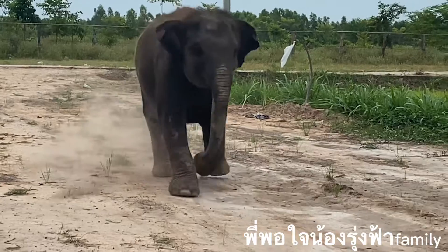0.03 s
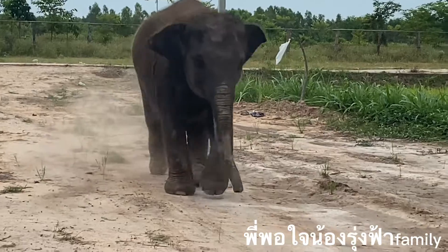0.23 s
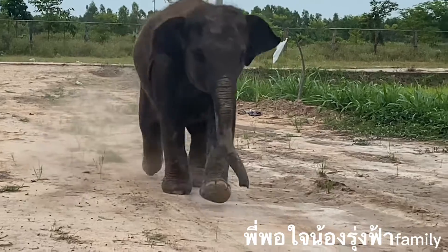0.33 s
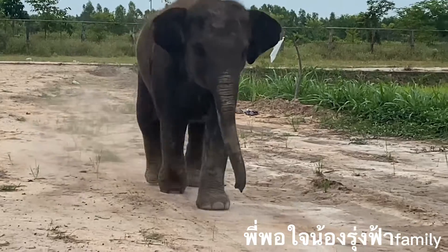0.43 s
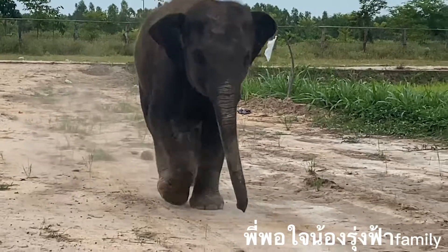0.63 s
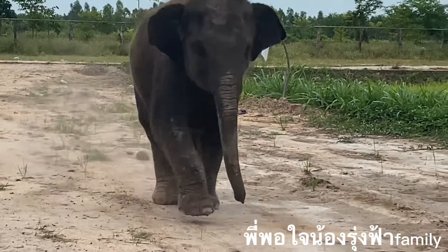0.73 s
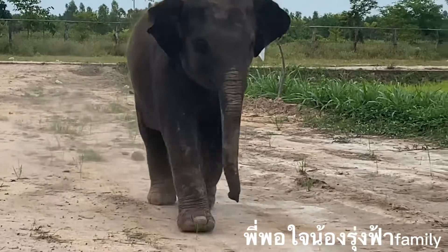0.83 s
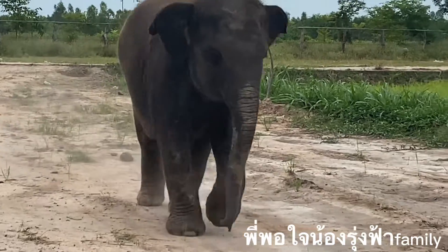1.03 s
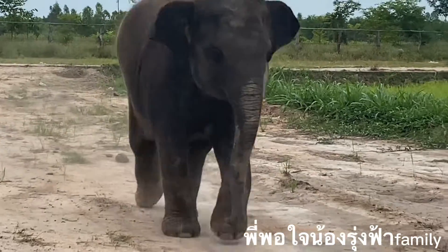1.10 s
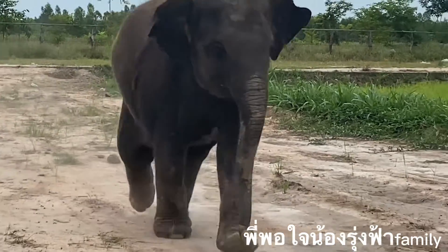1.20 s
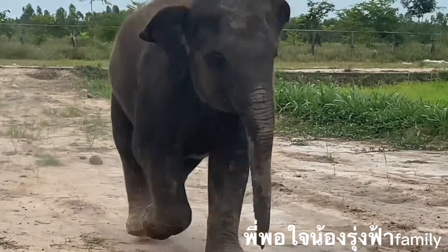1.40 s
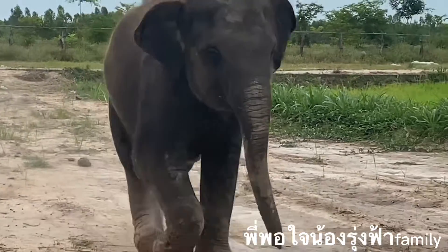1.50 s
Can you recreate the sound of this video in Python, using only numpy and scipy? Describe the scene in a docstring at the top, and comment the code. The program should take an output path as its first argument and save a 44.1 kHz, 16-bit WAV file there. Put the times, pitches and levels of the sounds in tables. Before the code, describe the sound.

A young elephant squeals once, high and raspy, as its heavy feet thud on sandy ground.

```python
"""Dry, dusty open ground with a far tree line, heard in stereo. A young elephant walks up to the
microphone, its feet knocking on the crust and scuffing the sand, and squeals once through its trunk:
a rasping start, a thin high arch, then a loud pure note that rings off the trees.
A small bird trills in the distance, another slurs, and a low outdoor rumble lies under everything."""
import sys
import numpy as np
from scipy import signal
from scipy.fft import rfft, irfft, next_fast_len
from scipy.io import wavfile
from scipy.ndimage import map_coordinates

SR = 44100
rng = np.random.default_rng(int(sys.argv[2]) if len(sys.argv) > 2 else 0)


def store_pcm(level_fs):
    """Save levels as 16-bit WAV."""
    pcm = np.round(np.clip(level_fs, -1, 1) * 32767).astype(np.int16)
    wavfile.write(sys.argv[1], SR, np.atleast_2d(pcm).T)


N = 68355

# faint open air all round: frequency_hz, density_db
AIR_COLOUR = [(90, -8), (150, 5), (530, -12), (1400, -36), (2300, -25.5), (4600, -28.5), (7500, -22.5),
              (9000, -48), (11000, -31), (15500, -51)]
# low outdoor rumble: frequency_hz, density_db
RUMBLE_COLOUR = [(20, -40.5), (35, -20), (52, 5.5), (75, 0), (105, -1), (135, -9.5), (190, -21.5),
                 (320, -29), (600, -43.5), (1500, -84)]
# its swell: time_s, level_db
RUMBLE_LEVEL = [(0, -50), (.5, -47.5), (.95, -49), (1.1, -43.5), (1.25, -48), (1.55, -48)]
# a low hum, to the right: time_s, level_db
HUM_LEVEL = [(0, -65), (.93, -58), (1.01, -37), (1.07, -42), (1.12, -55), (1.24, -49.5), (1.3, -44),
             (1.45, -47), (1.55, -45)]
# soles dragging in the sand: time_s, level_db
SCUFF_LEVEL = [(0, -61), (.11, -65.5), (.15, -70.5), (.27, -64.5), (.6, -58), (.76, -58), (.85, -75),
               (.89, -57.5), (.97, -53.5), (1.06, -64.5), (1.1, -68.5), (1.19, -68), (1.27, -59),
               (1.36, -48.5), (1.435, -50), (1.455, -68), (1.55, -73)]
# sliding sand: frequency_hz, density_db
SAND_COLOUR = [(120, 0), (200, -11.5), (340, 0), (560, -6), (800, 1), (1400, -4.5), (2000, -11.5),
               (3400, -15), (6800, -23), (9000, -27), (15000, -38)]
# grit snapping underfoot: start_s, level_db
GRIT_SNAPS = [(0.03, -43), (.095, -50), (0.71, -48.5), (0.878, -51), (1.15, -51.5), (1.29, -40),
              (1.352, -41.5), (1.367, -42), (1.537, -58)]
# filter on the snaps: frequency_hz, gain_db
GRIT_COLOUR = [(300, -32.5), (1500, 0.5), (3500, 1.5), (5500, -8), (8000, -12.5), (15000, -20)]
# feet knocking on the crust: start_s, pitch_drop_s, level_db
KNOCKS = [(.093, 0.0018, -49.5), (.894, 0.0022, -41), (0.912, 0.0016, -56), (.934, 0.0014, -43.5),
          (.992, 0.0018, -37), (1.042, 0.0023, -36), (1.133, 0.0021, -42.5), (1.18, 0.0024, -48),
          (1.205, 0.0026, -44), (1.246, 0.0022, -43), (1.287, .004, -41), (1.537, 0.0025, -40)]
# filter on the crumbling crust: frequency_hz, gain_db
CRUMBLE_COLOUR = [(100, -22.5), (300, 4), (500, -1.5), (1000, 10), (1400, -10), (1900, -5), (2500, -22),
                  (5000, -34), (15000, -64)]
# soft, heavy footfalls: start_s, pitch_hz, t60_s, level_db
THUDS = [(0.119, 68, .11, -31), (0.192, 61.5, 0.1, -24), (0.277, 332, 0.035, -38),
         (0.311, 76.2, 0.35, -32.5), (0.429, 292, 0.064, -46), (0.642, 60, 0.15, -30),
         (0.758, 76, 0.079, -23), (0.877, 288, .05, -43), (1.041, 58.2, 0.11, -32),
         (1.354, 292, 0.024, -22)]
# one bird's slurs, mostly rising: start_s, length_s, from_hz, to_hz, level_db
SLURS = [(0.136, 0.033, 5500, 4300, -68.5), (0.796, 0.042, 2690, 5160, -69), (.828, 0.041, 4660, 4350, -69),
         (0.861, 0.055, 5100, 6200, -68.5), (1.013, 0.021, 3920, 4400, -67),
         (1.223, 0.033, 3790, 5250, -64)]
# the distant bird's trill: start_s, level_db
TRILL_NOTES = [(.993, -72), (1.041, -68), (1.072, -72), (1.103, -68.5), (1.134, -66), (1.171, -61),
               (1.205, -58), (1.241, -56), (1.277, -54.5), (1.313, -52), (1.349, -54.5), (1.387, -53),
               (1.421, -52), (1.46, -52), (1.512, -58)]
# the squeal's melody: time_s, pitch_hz
SQUEAL_PITCH = [(.165, 1560), (.185, 1470), (.204, 1680), (.222, 1455), (.27, 1440), (.286, 1640),
                (.303, 2030), (.332, 2190), (.347, 2430), (.387, 2450), (.394, 2630), (.42, 2680),
                (.434, 2386), (.456, 2170), (.476, 1875), (.486, 1846), (.499, 1840), (.507, 1811),
                (.517, 1829), (.53, 1931)]
# its tone, before roughness lowers it: time_s, level_db
SQUEAL_LEVEL = [(.162, -95), (.172, -44), (.202, -40), (.212, -23), (.223, -31.5), (.232, -25), (.28, -26),
                (.29, -38), (.325, -39.5), (.338, -43.5), (.355, -35.5), (.38, -38.5), (.405, -46),
                (.44, -40.5), (.463, -36), (.473, -24), (.494, -21.5), (.509, -16.5), (.523, -25),
                (.533, -36), (.545, -91)]
# its hoarseness: time_s, roughness (0-1)
SQUEAL_ROUGHNESS = [(.17, .9), (.2, 0.85), (.212, 0.41), (.275, 0.7), (.295, 0.4), (.33, 0.75), (.35, 0.2),
                    (.385, 0.2), (.4, 0.3), (.43, 0.42), (.455, 0.41), (.476, 0.01), (.518, 0), (.533, 0.5)]
# its side of the microphone: time_s, left_over_right_db
SQUEAL_PAN = [(.2, 0), (.4, -2), (.47, 2), (.55, 1.5)]
# what the trunk passes: frequency_hz, gain_db
TRUNK_RESONANCES = [(500, -40), (900, -20), (1400, 24), (1850, 1.5), (2400, -9), (2900, -8.5),
                    (3700, -33.5), (4400, -14), (4900, -8.5), (5550, -14), (6400, -40.5), (7400, -28.5),
                    (8200, -32), (10600, -39), (16000, -45.5)]
# brief whistles beside the main tone: start_s, end_s, pitch_hz, level_db
SIDE_TONES = [(.176, 0.203, 1450, -34.5), (0.185, 0.206, 1810, -46.5), (0.221, 0.246, 1048, -40),
              (.236, 0.248, 1800, -41.5), (0.304, 0.32, 1455, -33.5), (0.32, 0.435, 1400, -73),
              (0.391, 0.448, 2404, -51.5), (.436, 0.472, 1470, -57), (0.521, 0.543, 2362, -50)]
# air rasping through the trunk: time_s, level_db
RASP_LEVEL = [(.163, -67.5), (.17, -43), (.2, -42), (.24, -38.5), (.28, -43), (.318, -42), (.34, -55),
              (.39, -71), (.45, -46.5), (.48, -51.5), (.525, -54), (.545, -77.5)]
# the rasp's spectrum: frequency_hz, density_db
RASP_COLOUR = [(400, -56.5), (800, -14), (1050, -10.5), (1450, 1), (1800, 2), (2250, -15.5), (2700, -14.5),
               (3200, -10), (4000, -19.5), (5000, -4), (5800, -16.5), (6600, -10), (7600, -26.5),
               (11000, -27.5), (16000, -61.5)]
# air escaping beside the tone: time_s, level_db
HISS_LEVEL = [(.3, -78), (.34, -68.5), (.4, -64.5), (.46, -60.5), (.51, -69), (.57, -70), (.6, -89.5)]
# the hiss's spectrum: frequency_hz, density_db
HISS_COLOUR = [(2500, -36), (5000, -7.5), (6500, -3), (8000, -0.5), (11000, -7), (16000, -23)]
# ring of the far trees: frequency_hz, t60_s
TREE_DECAY = [(200, .8), (1800, 1.06), (5500, 0.41), (12000, 0.72)]
# phase between the channels in the top treble: frequency_hz, right_lead_rad
TREBLE_PHASE = [(7400, 0), (9000, 3.14), (10900, 6.2), (11600, 6.4), (13100, 9.4), (14700, 12.5)]


def amp(db):
    """Decibels to gain."""
    return 10 ** (np.asarray(db) / 20)


def unit(x):
    """Scaled to rms 1."""
    return x / np.sqrt(np.mean(x ** 2) + 1e-20)


def along(points, hz):
    """Reads (frequency_hz, value) points at hz, on a log axis."""
    frequencies, values = np.transpose(points)
    return np.interp(np.log(hz + 1), np.log(frequencies + 1), values)


def curve(rows):
    """(time_s, value) points as one value per sample."""
    return np.interp(np.arange(N) / SR, *np.transpose(rows))


def wobble(per_s):
    """A smooth random curve with per_s knots a second."""
    return map_coordinates(rng.standard_normal(N // 8), [np.arange(N) * per_s / SR], mode="wrap")


def add(track, start_s, sound):
    """Mixes a sound into the track."""
    part = track[..., max(round(start_s * SR), 0):][..., :sound.shape[-1]]
    part += sound[..., :part.shape[-1]]


def coloured(x, spectrum):
    """x through a minimum-phase filter of this (frequency_hz, gain_db) shape."""
    size = 2 * next_fast_len(N)
    cepstrum = irfft(np.log(amp(along(spectrum, np.fft.rfftfreq(size, 1 / SR)))))
    cepstrum[1:size // 2] *= 2
    cepstrum[size // 2 + 1:] = 0
    return irfft(rfft(x, size) * np.exp(rfft(cepstrum)), size)[..., :x.shape[-1]]


def noise(spectrum, side_db):
    """Mid-side stereo noise of rms 1, narrower in the treble."""
    mid, side = coloured(rng.standard_normal((2, N)), spectrum)
    side = amp(side_db) * coloured(side, [(2400, -0.5), (4000, -16), (7000, -36), (9000, -24)])
    return unit(np.array([mid + side, mid - side]))


def phase_of(hz):
    """The running phase of a pitch curve, in radians."""
    return 2 * np.pi * np.cumsum(hz) / SR


def whistle(hz):
    """A short tone that swells and fades, rms 1 at its top."""
    swell = np.sqrt(2 * np.abs(np.sin(np.linspace(0, np.pi, len(hz)))))
    return swell * np.sin(phase_of(hz))


def panned(x, db):
    """Left louder than right by db."""
    return x * amp(np.array([db, -db]).reshape(2, -1) / 2)


def outdoors(hum_hz=104.8, right_lead_rad=0.79, air_db=-61.5):
    """The bed: faint air, an uneven low rumble and a wavering hum that swells about a second in."""
    phase = phase_of(hum_hz * (1 + 0.054 * wobble(24.97))) + np.array([[0], [right_lead_rad]])
    hum = np.sqrt(2) * np.sin(phase) * amp(curve(HUM_LEVEL) + 2.5 * wobble(25))
    rumble = noise(RUMBLE_COLOUR, side_db=-12.5) * amp(curve(RUMBLE_LEVEL) + 1.9 * wobble(14.04))
    return amp(air_db) * noise(AIR_COLOUR, side_db=-2) + rumble + panned(hum, db=-5)


def scuff():
    """Grainy sand slides under the soles, near the centre."""
    sand = noise(SAND_COLOUR, side_db=-4)
    grains = unit(amp(3 * wobble(700)))
    return panned(sand * grains * amp(curve(SCUFF_LEVEL)), db=-1)


def feet(from_hz=1800, to_hz=365, attack_s=.0006, knock_t60_s=.034, crumble_t60_s=.049, grit_t60_s=.032):
    """Close by, the crust knocks with a falling pitch and crumbles, grit snaps and heavy feet thud."""
    knocks, crumbs, grit, thuds = np.zeros(N), np.zeros((2, N)), np.zeros(N), np.zeros(N)
    t = np.arange(SR // 5) / SR
    for start_s, drop_s, db in KNOCKS:
        knock = np.sin(phase_of(to_hz + (from_hz - to_hz) * np.exp(-t / drop_s)))
        add(knocks, start_s, amp(db - 60 * t / knock_t60_s) * (1 - np.exp(-t / attack_s)) * knock)
        click = amp(db + 14) * (t == 0)
        crumble = amp(db + 3.5 - 60 * t / crumble_t60_s) * rng.standard_normal((2, len(t)))
        add(crumbs, start_s, click + crumble)
    for start_s, db in GRIT_SNAPS:
        add(grit, start_s, amp(db - 60 * t / grit_t60_s) * rng.laplace(size=len(t)))
    for start_s, hz, t60_s, db in THUDS:
        attack = 1 - np.exp(-t * hz / .4)  # time constant of 0.4 cycles
        add(thuds, start_s, amp(db - 60 * t / t60_s) * attack * np.sin(2 * np.pi * hz * t))
    dirt = coloured(crumbs, CRUMBLE_COLOUR) + coloured(grit, GRIT_COLOUR)
    return panned(knocks + dirt + thuds, db=-1.3)


def birds(note_s=.021, note_hz=3362, fall_hz=398):
    """Far off to the left, one bird slurs thinly; another's trill of falling notes grows louder."""
    song = np.zeros(N)
    falling_hz = note_hz - fall_hz * np.linspace(0, 1, round(note_s * SR)) ** 2.67
    for start_s, db in TRILL_NOTES:
        add(song, start_s, amp(db) * whistle(falling_hz * (1 + rng.normal(0, 0.004))))
    for start_s, length_s, from_hz, to_hz, db in SLURS:
        glide_hz = np.linspace(from_hz, to_hz, round(length_s * SR))
        waver = 1 + 0.062 * wobble(600)[:len(glide_hz)]
        add(song, start_s, amp(db) * whistle(glide_hz * waver))
    return panned(song * amp(3.6 * wobble(250)), db=3.5)


def squeal(jitter=0.0433, shimmer_db=3.5, flutter_per_s=650):
    """Close by, a tight, fluttering vibration sweeps its overtones through the trunk's resonances."""
    rough, pitch_hz = curve(SQUEAL_ROUGHNESS), curve(SQUEAL_PITCH)
    flutter = wobble(flutter_per_s) + 0.93 * wobble(2200)
    phase = phase_of(pitch_hz * (1 + jitter * rough * flutter))
    orders = np.arange(1, 6)[:, None]
    high = orders > 3  # these harmonics are weaker and more blurred
    gains = amp(along(TRUNK_RESONANCES, orders * pitch_hz) - 5 * high)
    blur_rad = 0.52 * (orders - 1) * (rough + 0.18) + .45 * high
    harmonics = np.sin(orders * phase + blur_rad * np.array([wobble(900) for _ in orders]))
    tone = np.sqrt(2) * (gains * harmonics).sum(0) / np.linalg.norm(gains, axis=0)
    shimmer = wobble(flutter_per_s) + wobble(168.4)
    tone *= amp(curve(SQUEAL_LEVEL) + rough * (shimmer_db * shimmer - 5.1))
    for start_s, end_s, hz, db in SIDE_TONES:
        waver = 1 + 0.011 * wobble(500)[:round((end_s - start_s) * SR)]
        add(tone, start_s, amp(db) * whistle(hz * waver))
    return panned(tone + trunk_air(phase), curve(SQUEAL_PAN))


def trunk_air(phase, side_db=-9.5):
    """Air rasps through the trunk, pulsing twice a cycle of the tone, and escapes as a hiss."""
    rasp = unit(noise(RASP_COLOUR, side_db) * (1 + 0.27 * np.cos(2 * phase)))
    hiss = noise(HISS_COLOUR, side_db) * amp(curve(HISS_LEVEL))
    return hiss + rasp * amp(curve(RASP_LEVEL) + 0.6 * wobble(400))


def tree_echo(x):
    """The far tree line answers; each frequency dies at its own speed."""
    hz, t, spectrum = signal.stft(rng.standard_normal((2, SR)), SR, nperseg=256)
    decay = amp(-60 * t / along(TREE_DECAY, hz)[:, None])
    tail = signal.istft(spectrum * decay, SR, nperseg=256)[1]
    tail = tail + .5 * tail[::-1]  # crossfeed narrows the image
    return signal.fftconvolve(x, tail / np.linalg.norm(tail[0]), axes=1)[:, :N]


def scene():
    """At the microphone: the elephant near and almost dry, the distant birds with more echo."""
    elephant, song = squeal() + feet(), birds()
    echo = tree_echo(amp(-28) * elephant + amp(-13) * song)
    return elephant + song + echo + scuff() + outdoors()


def record(dry, top_hz=15900):
    """The two channels part in phase in the top treble, and nothing is kept above top_hz."""
    size = next_fast_len(N + SR // 2)
    hz = np.fft.rfftfreq(size, 1 / SR)
    right_lead_rad = np.interp(hz, *np.transpose(TREBLE_PHASE))
    turn = np.exp(.5j * np.array([[-1], [1]]) * right_lead_rad)
    return irfft(rfft(dry, size) * turn * (hz < top_hz), size)[:, :N]


dry = scene()
out = record(dry)
store_pcm(out)
```